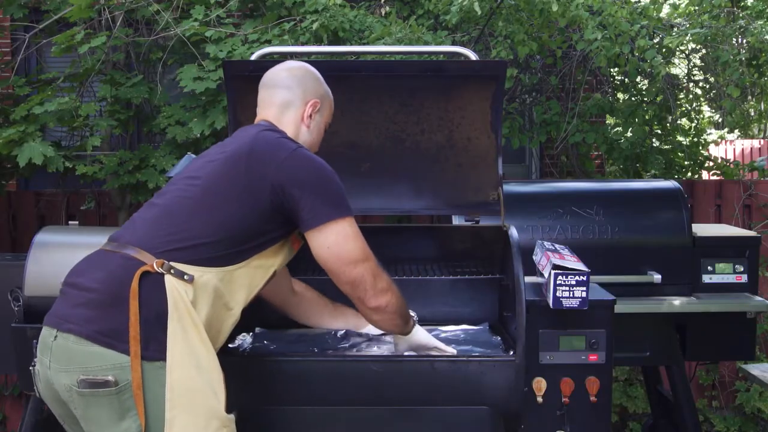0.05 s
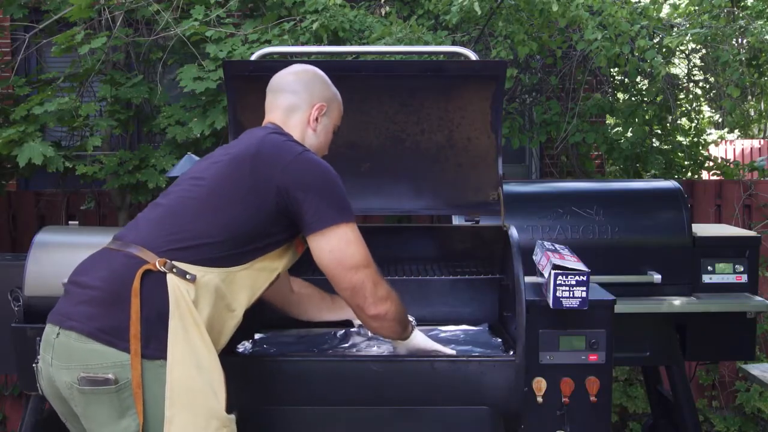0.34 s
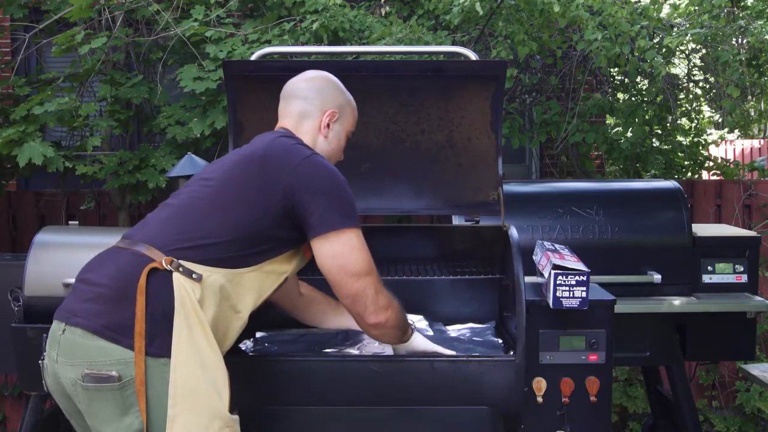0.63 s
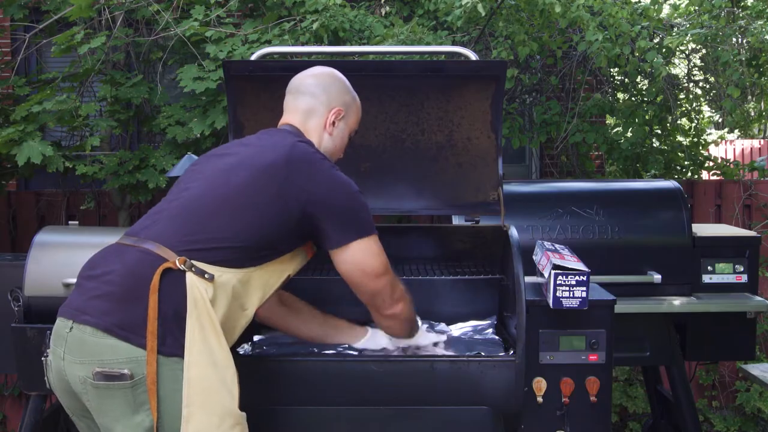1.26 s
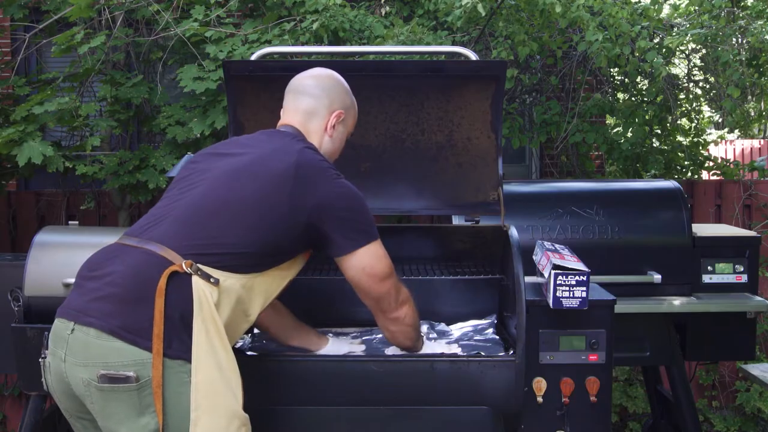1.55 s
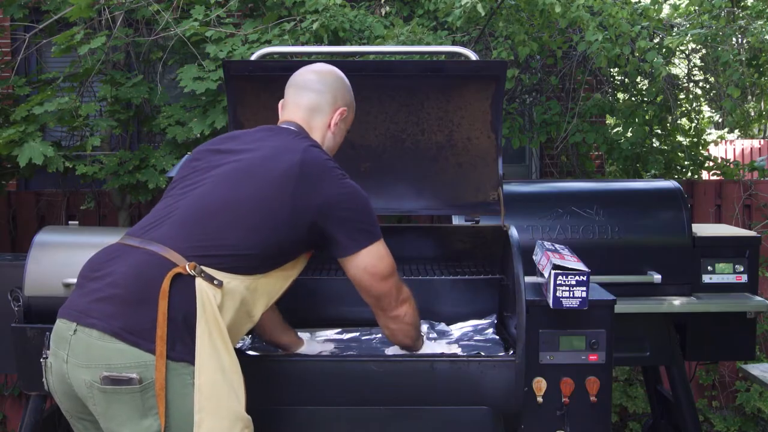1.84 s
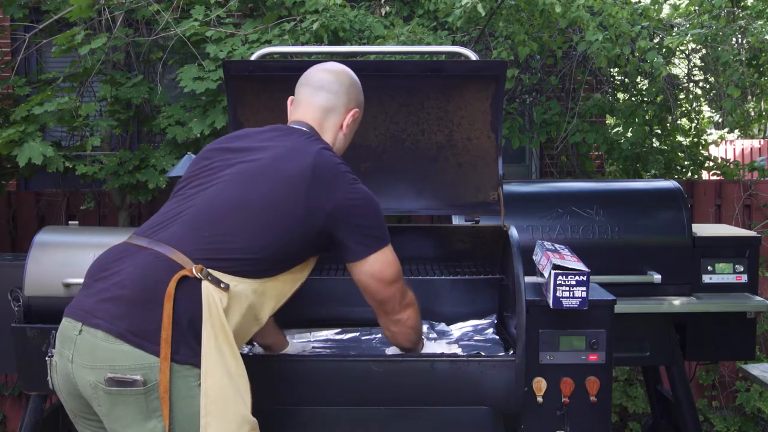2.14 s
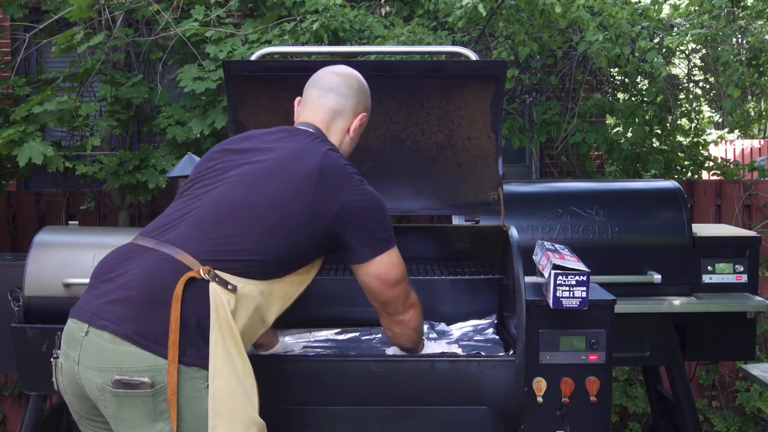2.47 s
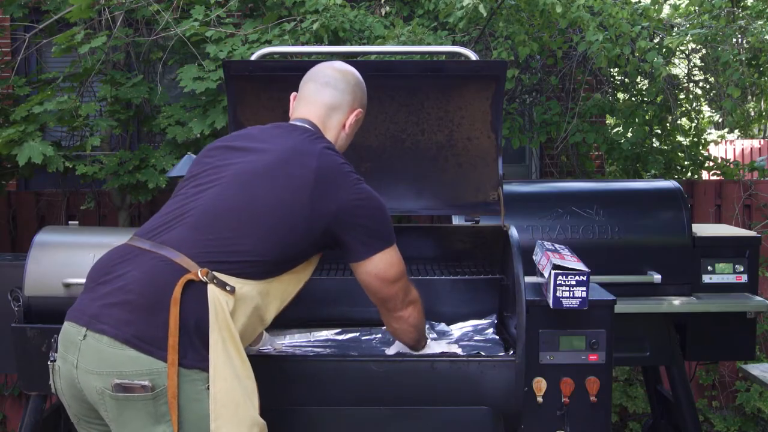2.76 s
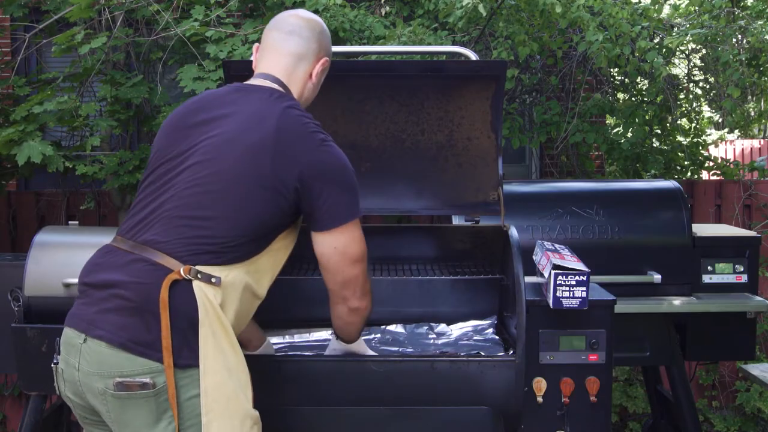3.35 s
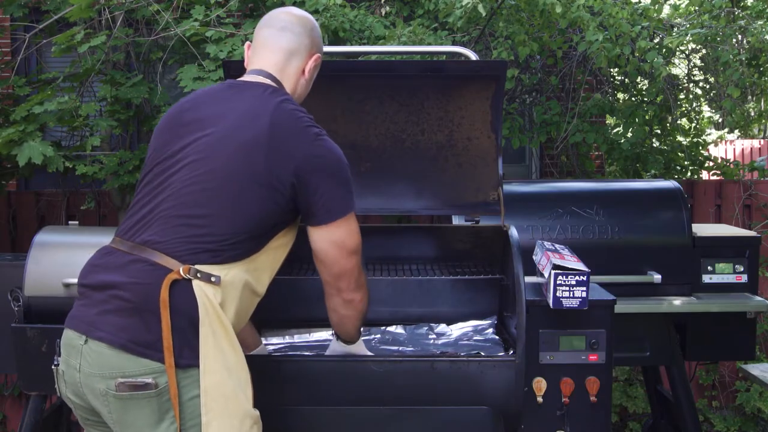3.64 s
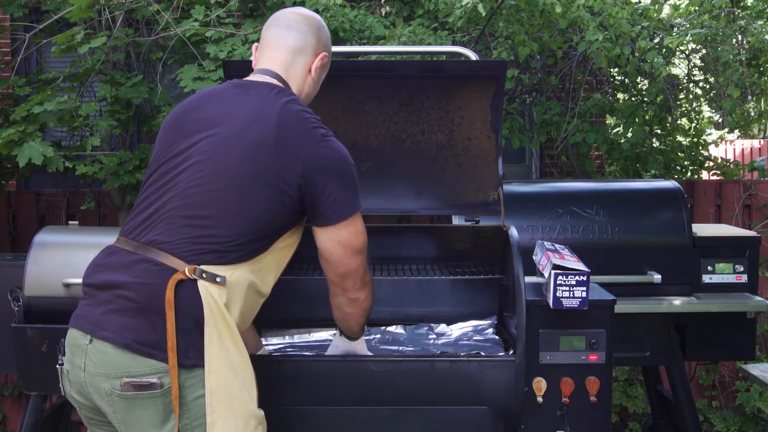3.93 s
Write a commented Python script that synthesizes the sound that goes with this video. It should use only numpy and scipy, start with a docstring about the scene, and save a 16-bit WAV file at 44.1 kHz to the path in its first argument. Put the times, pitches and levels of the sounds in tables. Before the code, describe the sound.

Hands rub foil flat in hissing, crackling strokes, with light bumps from a metal tray.

```python
"""Outdoors at an open barrel grill, two hands wipe aluminium foil flat over the drip tray.
Countless tiny slips make the foil hiss, creases snap and small wrinkles tick under the fingers.
Firm strokes make the steel tray scrape, bump and squeal, and the barrel adds a short ring to the foil.
Behind it all are the garden air, a steady shrill of insects and a low hum."""
import sys
import numpy as np
from scipy import signal
from scipy.fft import rfft, irfft
from scipy.io import wavfile
from scipy.ndimage import uniform_filter1d

SR = 44100
rng = np.random.default_rng(int(sys.argv[2]) if len(sys.argv) > 2 else 0)


def file_out(sig):
    """Save sig as 16-bit WAV at sys.argv[1]."""
    # one column per channel
    cols = np.atleast_2d(sig).T
    # limit, then scale
    lim = np.clip(cols, -1, 1)
    pcm = np.round(lim * 32767).astype(np.int16)
    wavfile.write(sys.argv[1], SR, pcm)


N = 176400  # 4 seconds
T = np.arange(N) / SR

# Levels in the tables are relative: the functions turn them up or down.
# The tone of the air, insects, foil hiss and wrinkle ticks. Each row: frequency in Hz, level in dB.
AIR_TONE = [(30, -48), (55, -1), (100, 3.5), (250, 2.5), (450, 1), (680, 3.5), (1100, -11.5), (2000, -9),
            (5000, -15), (14000, -43)]
INSECT_TONE = [(4000, -40), (5400, -12), (6400, -5), (6900, -6), (7450, 0.5), (8100, -9), (8700, -6),
               (9600, -14), (11500, -24), (15000, -41)]
FOIL_TONE = [(300, -26.5), (900, -14.5), (1750, -11.5), (2100, -8), (2500, -5), (3100, -1.5), (4200, 0.5),
             (4850, -3.5), (5330, -9.5), (5800, -3), (7000, 0.5), (8700, -3), (10300, -1), (12800, -1.5),
             (14000, -4.5), (15400, -18.5)]
CRINKLE_TONE = [(2000, -19), (5300, -6), (6800, -4), (13000, 1), (15400, -17)]
# The low and the higher notes the tray rings at. Each row: pitch in Hz, width in Hz, level in dB.
RUMBLE_NOTES = [(120, 24.7, 3), (159, 47.6, 0), (227.4, 49.5, 0)]
SCRAPE_NOTES = [(442, 130, -12.5), (635.4, 52, 2), (815, 124, -2.5), (955, 90, -0.5), (1109, 88, -0.5),
                (1320, 106, -7), (1500, 164, -3.5)]
# How loud the tray is. Each row: time in seconds, scrape in dB, rumble in dB.
TRAY_LEVELS = [(0.0, -38, -39.5), (0.2, -39.5, -53), (0.29, -44, -44.5), (0.59, -37.5, -45.5),
               (1.26, -43.5, -46), (1.76, -38, -41), (1.87, -37.5, -35.5), (1.93, -34, -39),
               (2.1, -28.5, -36), (2.24, -43.5, -53), (2.36, -32.5, -34), (2.54, -37.5, -48),
               (2.56, -30.5, -36.5), (2.86, -44.5, -46.5), (3.03, -37, -42), (3.27, -59, -49),
               (3.32, -28, -30), (3.42, -37, -40), (3.56, -29.5, -30.5), (3.59, -45.5, -39),
               (3.81, -29.5, -36.5), (3.9, -42, -40), (3.97, -23.5, -33), (4.0, -44, -50)]
# The tray shifts under the palm. Each row: peak time in seconds, thud in dB, clank in dB, ring in Hz.
TRAY_BUMPS = [(0.612, -50, -32, 1080), (1.853, -31, -28.5, 1537), (2.133, -39, -28, 980),
              (2.299, -36, -38, 1500), (2.349, -44, -25.5, 1530), (2.47, -36, -28.5, 642),
              (2.551, -44, -30, 1315), (2.587, -35, -30, 1480), (2.879, -50, -39, 1550),
              (3.317, -31.5, -31, 663), (3.557, -34, -36, 974), (3.656, -27, -33, 952),
              (3.961, -40, -30, 820)]
# The hand judders on one spot. Each row: middle in seconds, length in seconds, pitch in Hz, level in dB.
TRAY_SQUEALS = [(1.998, 0.093, 640, -38.5), (2.177, 0.066, 606, -39), (2.35, 0.096, 1514, -32),
                (2.433, 0.053, 636, -38.5), (2.464, 0.038, 1470, -35), (2.652, 0.1, 635, -40),
                (2.714, 0.029, 4590, -25.5)]
# The rubbing: one list for each wipe, then the last push. Each row: time in seconds, level in dB.
WIPE_LEVELS = [
    [(0.0, -22), (0.098, -21), (0.118, -25), (0.126, -21.5), (0.162, -21.5), (0.198, -29), (0.22, -28),
     (0.23, -34), (0.24, -29), (0.256, -37.5), (0.3, -47.5)],
    [(0.405, -37.5), (0.447, -30), (0.5, -28.5), (0.517, -23.5), (0.553, -28.5), (0.566, -21.5),
     (0.596, -26.5), (0.613, -19), (0.77, -23), (0.828, -19.5), (0.864, -28), (0.884, -24), (0.972, -24),
     (1.036, -33), (1.045, -40)],
    [(1.045, -41), (1.049, -30), (1.069, -21), (1.105, -22.5), (1.13, -32), (1.173, -29.5), (1.181, -36),
     (1.195, -38)],
    [(1.325, -39), (1.339, -29.5), (1.385, -18.5), (1.5, -22.5), (1.665, -21.5), (1.72, -22), (1.75, -22.5),
     (1.919, -22), (2.153, -20.5), (2.217, -27), (2.243, -22), (2.26, -31)],
    [(2.26, -26), (2.27, -22.5), (2.284, -33), (2.294, -24), (2.426, -23.3), (2.475, -21), (2.53, -25),
     (2.598, -19), (2.655, -24), (2.684, -22.5), (2.765, -24), (2.8, -27.5), (2.825, -28), (2.84, -38)],
    [(2.84, -35), (2.864, -28), (2.872, -42), (2.88, -25), (2.918, -32), (2.924, -24), (3.006, -19),
     (3.022, -23.5), (3.134, -24.5), (3.16, -39), (3.19, -51)],
    [(3.272, -72), (3.281, -47), (3.297, -21), (3.505, -20.5), (3.521, -18.5), (3.629, -31), (3.647, -24),
     (3.673, -31.5), (3.685, -24.5), (3.713, -26), (3.739, -32), (3.755, -31)],
    [(3.759, -25), (3.781, -20.5), (3.797, -28), (3.811, -23.5), (3.833, -34.5), (3.845, -23.5), (3.9, -36)],
]
LAST_PUSH = [(3.905, -32), (3.923, -27.5), (3.934, -18.5), (3.972, -22), (3.986, -27), (4, -27)]
# Short brushes of the fingers. Each row: start in seconds, rise in seconds, level in dB, fade in seconds.
FINGER_BRUSHES = [(.122, .003, -23, .008), (0.368, .002, -24.5, 0.01), (.405, 0.011, -18, 0.019),
                  (.463, 0.012, -17.5, 0.011), (.560, .002, -28, .008), (.941, 0.0033, -21, 0.01),
                  (1.196, 0.0035, -19.5, 0.012), (1.245, .004, -25.5, 0.013), (1.334, .011, -19, .01),
                  (1.376, .004, -21, 0.0069), (1.830, .003, -22, .007), (2.127, 0.0054, -20, .015),
                  (2.294, 0.0088, -25, 0.0083), (2.709, .003, -18.5, 0.0067), (2.875, 0.0015, -26, .006),
                  (2.921, .002, -26, 0.0082), (3.041, .003, -20, 0.0087), (3.293, 0.0051, -24, 0.021),
                  (3.636, .004, -29, .012), (3.757, .003, -20.5, .009)]
# Boosts to the lower edge and the main hump of the hiss. Each row: time in seconds, boost in dB.
EDGE_BOOST = [(0, -2), (.2, 7), (.7, 0.5), (1.1, 3.5), (1.5, -5), (1.95, 1), (2.25, -5.5), (2.8, -5.5),
              (3.1, 3.5), (3.4, -0.5), (3.95, 3)]
HUMP_BOOST = [(.1, -1.5), (.7, -2), (1.1, -1), (1.4, -1.5), (1.95, 3.5), (2.3, .5), (2.8, -2), (3.1, 0),
              (3.3, -2), (3.45, -.5), (3.9, -0.5)]

AIR_DB, INSECT_DB, HUM_DB = -48.5, -43.5, -49
HUM_HZ, HUM_WIDTH_HZ = 116.9, 24
JUDDER_HZ, FOIL_JUDDER_DB, TRAY_JUDDER_DB = 74.8, 0.7, 2
CATCHES_PER_S, SCRAPE_DB, RUMBLE_DB, SQUEAL_WIDTH_HZ = 1500, -3, -2, 115
BUMP_RISE_S, THUD_S, CLANK_S, RING_S = 0.0053, 0.012, 0.011, 0.011
CLANK_DB, RING_DB = -2, -1.5
ECHO_S, ECHO_DB = 0.096, -14  # the barrel's echo falls by 60 dB in this time
CRINKLES_PER_S, CRINKLE_DB, WIPE_SHARE_DB = 500, -12, -8
CREASES_PER_S, CREASE_DB, CREASE_S = 220, -2.5, 0.0041
SLIPS_PER_S, PATCHES_PER_S, PATCH_DB = 30000, 55, 1.5
FIRM_DB, TILT_PER_OCTAVE = -20.5, 0.176  # a touch lighter than firm sounds duller
EDGE_HZ, EDGE_OCTAVES, HUMP_HZ, HUMP_OCTAVES = 2370, 0.23, 3950, 0.18


def gain(db):
    """Turn decibels into a number to multiply by."""
    return 10 ** (np.asarray(db) / 20)


def unit(x):
    """Scale a signal to an average power of 1."""
    return x / np.sqrt(np.mean(x ** 2))


def curve(rows):
    """Join (time, value) rows with straight lines."""
    return np.interp(T, *np.array(rows).T)


def wander(rate):
    """A smooth random drift, about 1 in size, that turns `rate` times a second."""
    step = max(int(SR / rate), 2)
    return unit(uniform_filter1d(np.repeat(rng.standard_normal(N // step + 1), step), step)[:N])


def colour(x, tone):
    """Filter a signal to follow a tone table, at power 1."""
    hz, db = np.array(tone, float).T
    freqs = np.maximum(np.fft.rfftfreq(2 * N, 1 / SR), 1)
    cepstrum = irfft(np.log(gain(np.interp(np.log(freqs), np.log(hz), db))))
    # folding this in half makes the filter ring only after a click, never before
    cepstrum[1:N] *= 2
    cepstrum[N + 1:] = 0
    return unit(irfft(rfft(x, 2 * N) * np.exp(rfft(cepstrum)))[:N])


def resonate(x, notes):
    """Let a signal set some notes ringing, at power 1."""
    return unit(sum((-1) ** k * gain(db) * signal.lfilter(*signal.iirpeak(hz, hz / width, SR), x)
                    for k, (hz, width, db) in enumerate(notes)))


def clicks(rate, spread_db):
    """Tiny random clicks, most weak and a few strong."""
    size = gain(spread_db * np.minimum(rng.exponential(size=N), 5))
    return (rng.random(N) < rate / SR) * size * rng.choice([-1, 1], N)


def burst(start, rise, fade):
    """A loudness shape that rises in a straight line, then dies away."""
    return np.clip((T - start) / rise, 0, 1) * np.exp(-np.maximum(T - start - rise, 0) / fade)


def bump(peak, db, fade):
    """The loudness shape of one bump of the tray."""
    return gain(db) * burst(peak - BUMP_RISE_S, BUMP_RISE_S, fade)


def garden():
    """Outdoor air, insects in the trees and a low, wavering hum, all made of filtered noise."""
    air = gain(AIR_DB) * colour(rng.standard_normal(N), AIR_TONE)
    insects = gain(INSECT_DB + wander(rate=60)) * colour(rng.standard_normal(N), INSECT_TONE)
    hum_note = [(HUM_HZ, HUM_WIDTH_HZ, 0)]
    hum = gain(HUM_DB) * resonate(resonate(rng.standard_normal(N), hum_note), hum_note)
    return air + insects + hum


def barrel(sound):
    """Add the dense, quickly dying echoes inside the steel barrel."""
    t = T[:SR // 4]
    tail = rng.standard_normal(len(t)) * gain(-60 * t / ECHO_S) * (t > .001)
    echoes = signal.fftconvolve(sound, tail / np.linalg.norm(tail))[:N]
    return (sound + gain(ECHO_DB) * echoes) / np.hypot(1, gain(ECHO_DB))


def tray(judder):
    """The foil catches and drags on the steel tray, which scrapes, rumbles and now and then bumps."""
    times, scrape_db, rumble_db = np.array(TRAY_LEVELS).T
    scrape = gain(np.interp(T, times, scrape_db) + SCRAPE_DB + TRAY_JUDDER_DB * judder)
    rumble = gain(np.interp(T, times, rumble_db) + RUMBLE_DB + TRAY_JUDDER_DB * judder)
    thuds = sum(bump(peak, db, THUD_S) for peak, db, _, _ in TRAY_BUMPS)
    clanks = sum(bump(peak, db + CLANK_DB, CLANK_S) for peak, _, db, _ in TRAY_BUMPS)
    catches = clicks(CATCHES_PER_S, spread_db=1.7)
    high = resonate(catches, SCRAPE_NOTES) * np.hypot(scrape, clanks)
    low = resonate(catches, RUMBLE_NOTES) * np.hypot(rumble, thuds)
    return high + low


def tray_rings():
    """Each bump leaves one note of the tray ringing; which one depends on where the palm presses."""
    return sum(bump(peak, db + RING_DB, RING_S) * np.sqrt(2) * np.sin(2 * np.pi * hz * (T - peak))
               for peak, _, db, hz in TRAY_BUMPS)


def squeals(judder):
    """Under the juddering hand, single rough notes briefly swell and fade."""
    catches = clicks(CATCHES_PER_S, spread_db=3.0) * gain(TRAY_JUDDER_DB * judder)
    out = 0
    for middle, length, hz, db in TRAY_SQUEALS:
        swell = gain(db) * np.exp(-(2 * (T - middle) / length) ** 2)
        note = resonate(catches, [(hz, SQUEAL_WIDTH_HZ, 0)])
        out = out + swell * resonate(note, [(hz, hz / 4, 0)])
    return out


def crinkles(rubbing, brushes):
    """The fingers flick small wrinkles over in a spray of bright ticks, most of all at each brush."""
    touch = sum(brushes) + rubbing * gain(WIPE_SHARE_DB)
    ticks = colour(clicks(CRINKLES_PER_S, spread_db=2), CRINKLE_TONE)
    return gain(CRINKLE_DB) * touch * ticks


def creases():
    """A flicker in loudness: creases snap at random, each shaking the sheet for a few milliseconds."""
    snaps = clicks(CREASES_PER_S, spread_db=1.0) ** 2
    shaking = signal.lfilter([1], [1, -np.exp(-2 / (CREASE_S * SR))], snaps)
    return unit(np.sqrt(1 + gain(CREASE_DB) ** 2 * shaking / shaking.mean()))


def foil(rubbing, brushes, judder):
    """Tiny slips hiss with the hands' effort; the tone shifts as new patches of foil are touched."""
    wiping = rubbing * gain(FOIL_JUDDER_DB * judder) * creases()
    effort = np.sqrt(wiping ** 2 + sum(brush ** 2 for brush in brushes))
    firmness_db = np.minimum(20 * np.log10(effort + 1e-6) - FIRM_DB, 1)
    spectrum = rfft(colour(clicks(SLIPS_PER_S, spread_db=0.94), FOIL_TONE))
    freqs = np.fft.rfftfreq(N, 1 / SR)
    # split the hiss into ten bands, each with its own changing level
    centres_hz = np.geomspace(1300, 14000, 10)
    hiss = 0
    for hz, this_band in zip(centres_hz, np.eye(len(centres_hz))):
        band = irfft(spectrum * np.interp(freqs, centres_hz, this_band), N)
        tilt_db = TILT_PER_OCTAVE * firmness_db * np.log2(hz / 6500)
        edge_db = curve(EDGE_BOOST) * np.exp(-(np.log2(hz / EDGE_HZ) / EDGE_OCTAVES) ** 2)
        hump_db = curve(HUMP_BOOST) * np.exp(-(np.log2(hz / HUMP_HZ) / HUMP_OCTAVES) ** 2)
        patch_db = PATCH_DB * wander(PATCHES_PER_S)
        hiss = hiss + band * gain(tilt_db + edge_db + hump_db + patch_db)
    return hiss * effort


def scene():
    """Mix everything into one channel; the same judder of the hands drives foil and tray."""
    judder = wander(JUDDER_HZ)
    rubbing = gain(curve(np.vstack([*WIPE_LEVELS, LAST_PUSH])))
    brushes = [gain(db) * burst(start, rise, fade) for start, rise, db, fade in FINGER_BRUSHES]
    hiss = barrel(foil(rubbing, brushes, judder))
    steel = tray(judder) + tray_rings() + squeals(judder)
    return (garden() + steel + hiss + crinkles(rubbing, brushes))[None]


def record(dry):
    """The microphone loses the deep bass below 80 Hz, and the treble above 15600 Hz is cut."""
    thin = signal.sosfilt(signal.butter(4, 80, "high", fs=SR, output="sos"), dry)
    return signal.sosfilt(signal.ellip(10, .1, 80, 15600, fs=SR, output="sos"), thin)


dry = scene()
out = record(dry)
file_out(out)
```